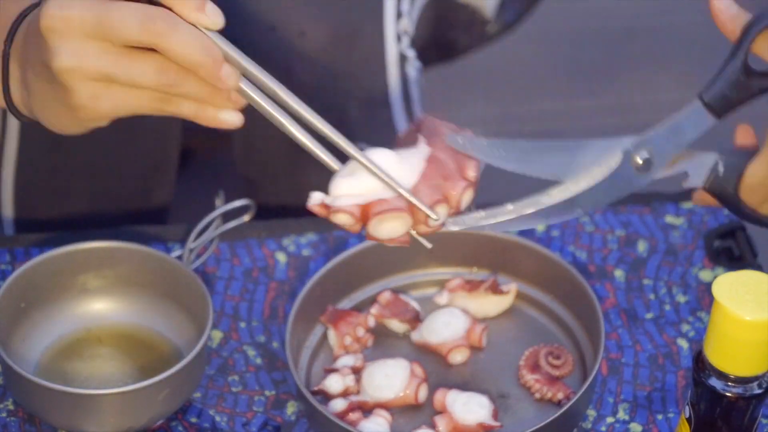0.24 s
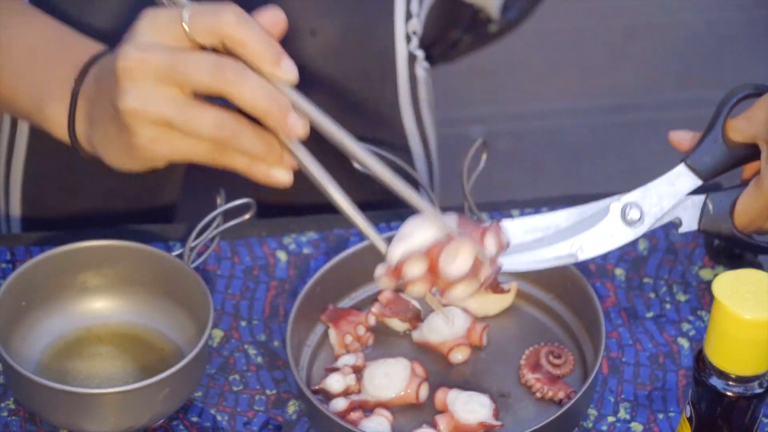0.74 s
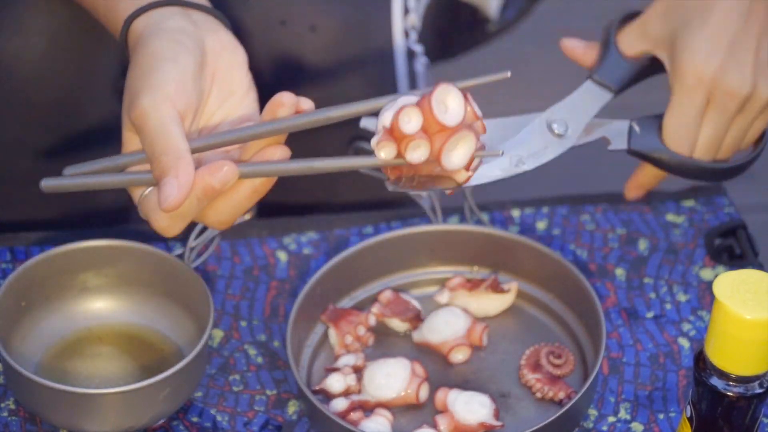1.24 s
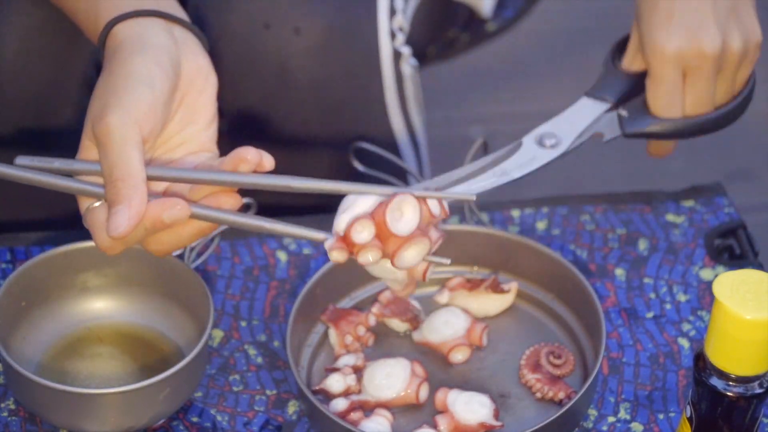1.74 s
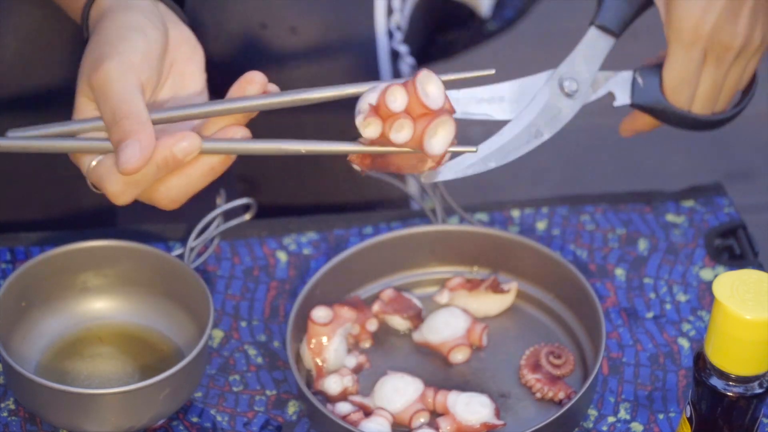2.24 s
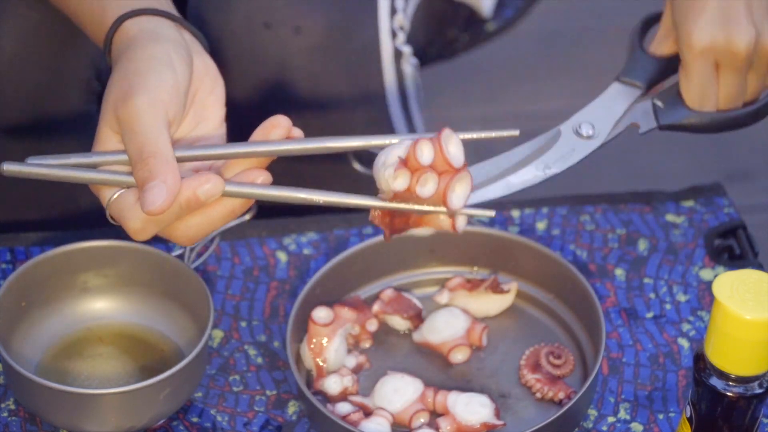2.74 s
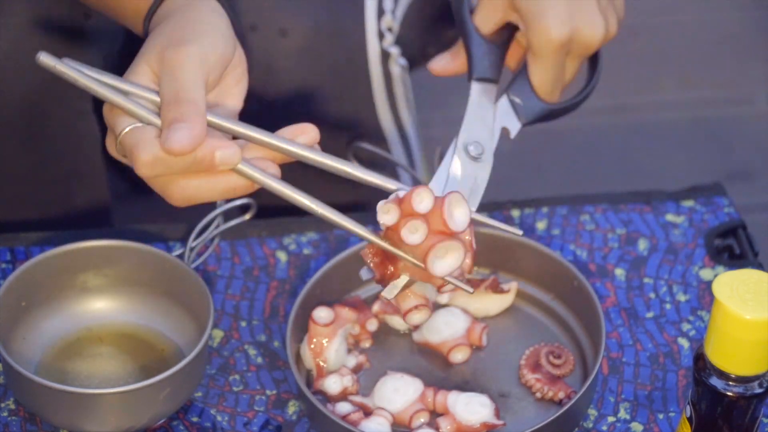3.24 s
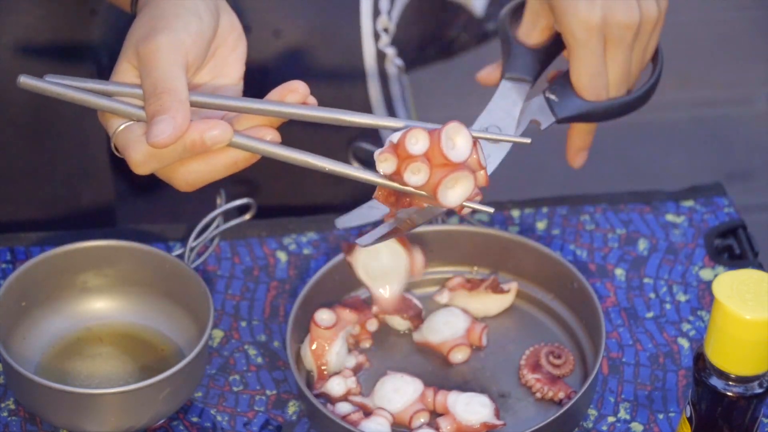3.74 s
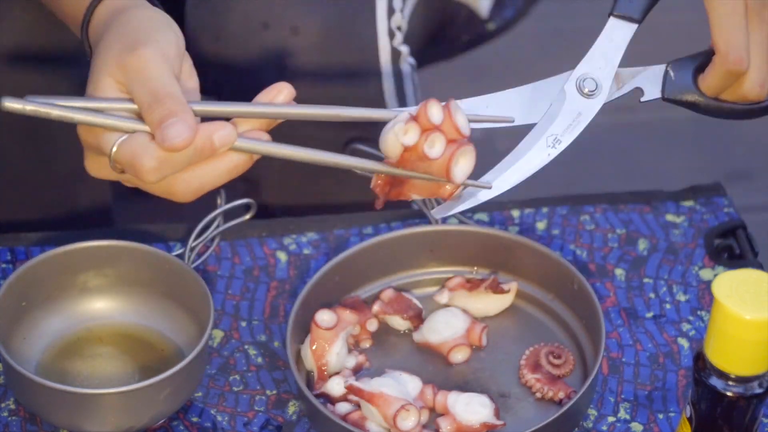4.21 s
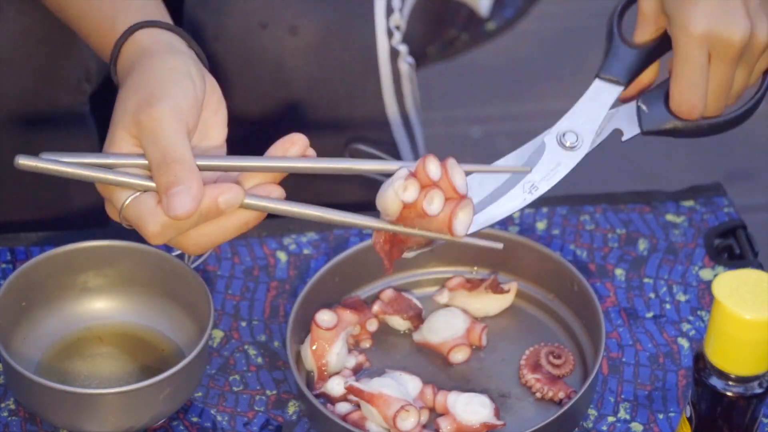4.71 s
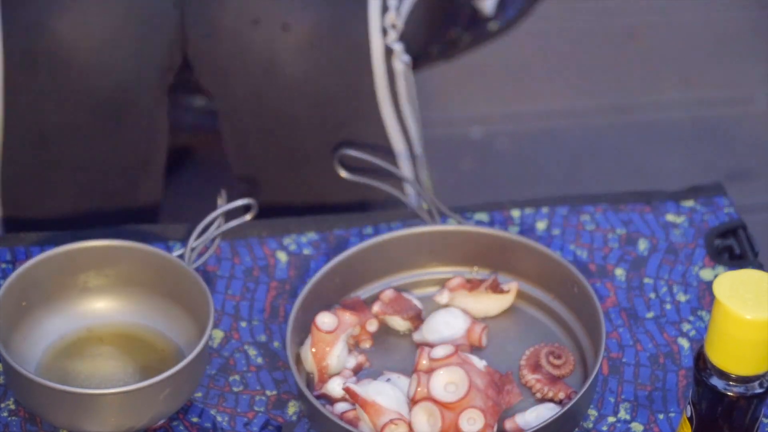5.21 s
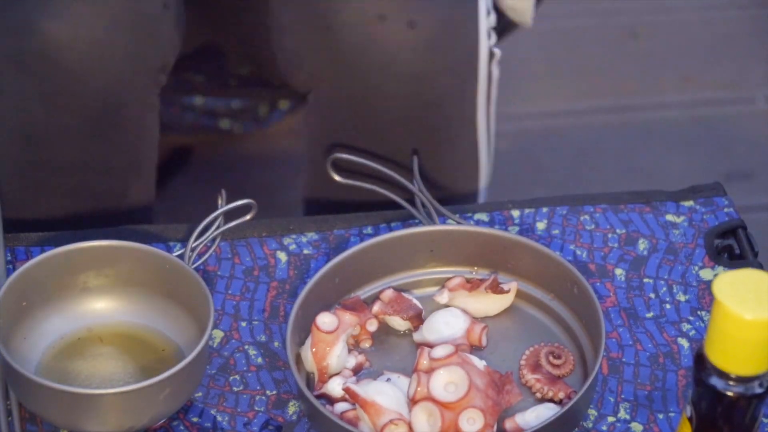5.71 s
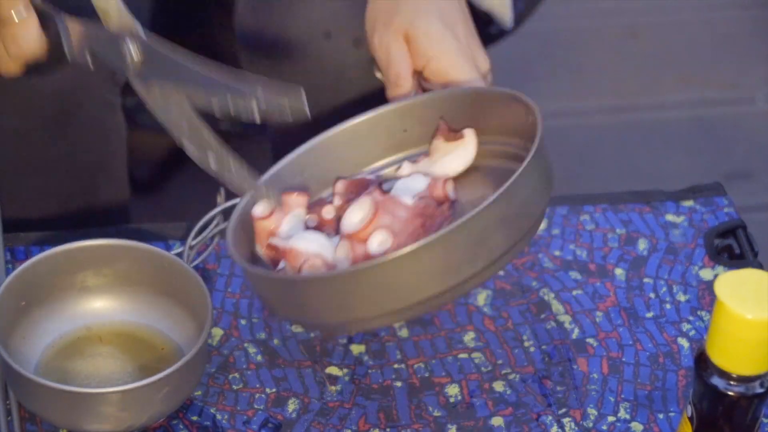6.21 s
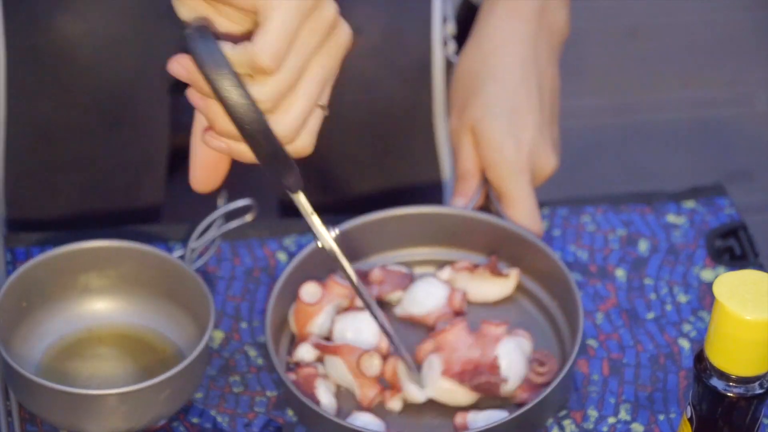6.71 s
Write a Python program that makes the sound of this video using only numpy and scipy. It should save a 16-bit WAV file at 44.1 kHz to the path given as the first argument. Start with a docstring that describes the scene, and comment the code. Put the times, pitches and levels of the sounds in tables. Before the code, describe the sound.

Close steel snips and brief rubbery squeaks over faint outdoor hiss and low handling bumps, ending with sharp clanks and scratches on a thin pan.

```python
"""Kitchen shears cut rubbery seafood held in steel chopsticks: wet flesh squeaks on the blades by stick-slip.
Sliding edges rub noise through the blade resonances, and light contacts click as short filtered bursts.
The tips knock and scratch a thin metal pan, whose decaying modes thud and whose resonances colour the grit.
A small microphone outdoors adds a low rumble and jolts of its mount, distant air and a slightly wavering hiss."""
import sys
import numpy as np
from scipy.fft import rfft, irfft, next_fast_len
from scipy.io import wavfile
from scipy.ndimage import map_coordinates

SR = 44100
rng = np.random.default_rng(int(sys.argv[2]) if len(sys.argv) > 2 else 0)


def log_audio(samples):
    """Write samples as a 16-bit WAV file to the path given in sys.argv[1]."""
    # one column per channel
    frames = np.atleast_2d(samples).T
    # limit to full scale, then quantise
    limited = np.clip(frames, -1, 1)
    pcm = np.round(limited * 32767).astype(np.int16)
    wavfile.write(sys.argv[1], SR, pcm)


N = 306936  # samples


def amp(db):
    """Decibel law: a level in dB as a linear amplitude."""
    return 10 ** (np.asarray(db) / 20)


def unit(x):
    """Normalisation: the signal scaled to an rms of 1."""
    return x / np.sqrt(np.mean(x ** 2) + 1e-20)


def filtered(x, response):
    """Linear filtering: the spectrum of x times a complex response of frequency."""
    m = next_fast_len(len(x) + 8192)
    spectrum = rfft(x, m) * response(np.fft.rfftfreq(m, 1 / SR))
    return irfft(spectrum, m)[:len(x)]


def resonant(modes):
    """Modal superposition: causal second-order resonances summed with alternating sign."""
    def response(f):
        total = 0
        for k, (centre, width, db) in enumerate(modes):
            damping = 1j * f * width
            total = total + (-1) ** k * amp(db) * damping / (centre * centre - f * f + damping + 1e-9)
        return total
    return response


def coloured(points):
    """Spectral envelope: gain interpolated in dB along a logarithmic frequency axis."""
    f, db = np.transpose(points)
    return lambda hz: amp(np.interp(np.log(hz + 1), np.log(f), db, left=-120, right=-120))


def noise(response):
    """Filtered random excitation: coloured noise of rms 1."""
    return unit(filtered(rng.standard_normal(N), response))


def wobble(rate, size=N):
    """Slow random modulation: a smooth curve through random knots, rate of them a second."""
    knots = rng.standard_normal(int(size * rate / SR) + 4)
    return map_coordinates(knots, [np.arange(size) * rate / SR])


def stroke(rows):
    """Piecewise-linear control: sample slice, soft-edged gate and interpolated columns of a short table."""
    s, *columns = np.transpose(rows)
    i = np.arange(round(s[0] * SR), min(N, round(s[-1] * SR)))
    # a stroke that reaches the last sample of the scene has no closing edge
    to_end = i[-1] - i + (i[-1] == N - 1) * SR
    edge = np.minimum(i - i[0], to_end) / (.002 * SR)
    return slice(i[0], i[-1] + 1), np.clip(edge, 0, 1), [np.interp(i / SR, s, c) for c in columns]


def swell(s, rise, fall):
    """Growth and decay: slice, gate and progress, -1 at the start, 0 when fullest, 1 at the end."""
    return stroke([(s - rise, -1), (s, 0), (s + fall, 1)])


def ends(u, first, last, power=1):
    """Power-law slopes: 0 when fullest, bending to a first and a last value."""
    return np.where(u < 0, first, last) * np.abs(u) ** power


def add(out, s, sound):
    """Superposition: mix a short sound in at s seconds."""
    out[round(s * SR):][:len(sound)] += sound


def ring(modes, seconds=.15, rise=0.00042):
    """Free vibration: exponentially decaying sines, each at a new strength for every blow."""
    t = np.arange(int(seconds * SR)) / SR
    spread_db = rng.normal(0, 1.5, len(modes))
    waves = [amp(db - 60 * t / t60) * np.sin(2 * np.pi * hz * t) for hz, db, t60 in modes]
    return amp(spread_db) @ waves * (1 - np.exp(-t / rise))


def taps(events, modes, **shape):
    """Impulsive excitation: touches that leave a body ringing in its modes."""
    out = np.zeros(N + SR)
    for s, db in events:
        add(out, s, amp(db) * ring(modes, **shape))
    return out[:N]


def grit(size, modes, clump_db=0):
    """Frictional excitation: lumpy noise of rms 1 from a set of resonances."""
    lumps = amp(3 * wobble(350, size=size))
    clumps = amp(clump_db * wobble(66, size=size))
    return unit(filtered(rng.standard_normal(size), resonant(modes)) * lumps * clumps)


# Level of the distant outdoor air: (time [s], level [dB])
AIR_LEVEL = [(0.0, -65), (1.18, -61.5), (6.96, -68)]
# Spectra of the air and of the microphone's hiss: (frequency [Hz], relative density [dB])
AIR_SPECTRUM = [(150, -26), (250, -9), (301, -12), (344, -14), (561, -9.5), (1600, -19), (2080, -42),
                (3520, -120)]
HISS_SPECTRUM = [(530, -36), (900, -2), (1470, -4), (2240, -1), (2780, -1), (3330, -1), (4610, -1),
                 (8510, -1.5), (12800, -6), (15900, -9)]
HISS_DB = -57.5


def background():
    """Stationary noise, slowly modulated: distant outdoor air and the microphone's hiss."""
    s, db = np.transpose(AIR_LEVEL)
    air_db = np.interp(np.arange(N) / SR, s, db) + 0.75 * wobble(11)
    air = amp(air_db) * noise(coloured(AIR_SPECTRUM))
    hiss = amp(HISS_DB + 1.56 * wobble(8)) * noise(coloured(HISS_SPECTRUM))
    return air + hiss


# Shaking of the microphone's mount: (time [s], low resonances [dB], high resonances [dB])
MOUNT_SHAKE = [(0, -42, -52), (.4, -44, -47.5), (.6, -49, -66.5), (1.3, -48, -59), (1.5, -58, -81),
               (2, -53, -65.5), (2.3, -43, -52), (2.75, -46.5, -55), (3.05, -56.5, -68.5), (5.6, -56, -64),
               (6.1, -51, -62.5), (6.4, -58.5, -64), (6.96, -52, -60)]
# Low and high resonances of the mount: (frequency [Hz], width [Hz], relative level [dB])
MOUNT_LOW_MODES = [(59.9, 19.1, 2), (84.7, 32.8, -2)]
MOUNT_HIGH_MODES = [(163.2, 31, 5), (232.7, 16.6, 0.5)]


def rumble():
    """Forced vibration: lumpy noise drives the resonances of the microphone's mount."""
    s, low_db, high_db = np.transpose(MOUNT_SHAKE)
    t, lumps = np.arange(N) / SR, wobble(14)
    low = unit(noise(resonant(MOUNT_LOW_MODES)) * amp(1.3 * lumps))
    high = unit(noise(resonant(MOUNT_HIGH_MODES)) * amp(2.86 * lumps))
    return amp(np.interp(t, s, low_db)) * low + amp(np.interp(t, s, high_db)) * high


# Jolts of the mount: (time [s], strength [dB], middle modes against it [dB], knock against it [dB])
MOUNT_JOLTS = [(.063, -35.5, 1.5, -12), (0.238, -21, -15, -22), (.327, -22, -5.5, -4),
               (0.89, -37.5, -22, -27), (1.094, -48.5, 2.5, 7.5), (1.271, -39, -22, -20),
               (2.038, -32, -12, -27), (2.251, -35, -5.5, -14), (2.37, -29, -10.5, -21),
               (5.078, -48.5, 4, -8), (5.937, -34.5, -4.5, -8)]
# Low, middle and knocking modes: (frequency [Hz], relative level [dB], decay by 60 dB [s])
JOLT_LOW_MODES = [(61.8, 3, 0.3), (82.9, -1, 0.15)]
JOLT_MIDDLE_MODES = [(120, 0, 0.28), (160.2, 4, 0.23), (217.6, -3, 0.19)]
JOLT_KNOCK_MODES = [(265.5, 1, 0.087), (340, 0, 0.055), (435, -7, 0.07), (744, -3, 0.022)]


def jolts():
    """Transient response: soft pushes swing the mount, and quicker onsets ring its higher modes."""
    s, db, middle_db, knock_db = np.transpose(MOUNT_JOLTS)
    low = taps(zip(s, db), JOLT_LOW_MODES, seconds=.5, rise=0.008)
    middle = taps(zip(s, db + middle_db), JOLT_MIDDLE_MODES, seconds=0.65, rise=0.0031)
    knock = taps(zip(s, db + knock_db), JOLT_KNOCK_MODES, rise=0.0025)
    return low + middle + knock


# Tips scratching the pan: (time when fullest [s], rise [s], fall [s], wall level [dB],
# bottom level [dB], lift of the highest bottom mode [dB])
PAN_SCRATCHES = [(5.402, .008, 0.007, -62, -40, -9), (5.426, 0.0091, 0.017, -59, -40.5, -8),
                 (6.162, 0.0031, 0.024, -57, -33, 6), (6.181, 0.0021, .009, -33, -41, 3),
                 (6.193, 0.0052, 0.0088, -42, -44, 1), (6.204, 0.0044, 0.013, -47, -40.5, 6),
                 (6.223, 0.0075, 0.021, -58, -45, -4), (6.517, 0.0051, 0.0056, -27.5, -37, 1.5),
                 (6.649, 0.0027, 0.02, -27, -32.5, 0.5), (6.67, 0.0088, 0.0072, -33.5, -43.5, 12),
                 (6.689, .003, 0.015, -40, -40, 7), (6.707, 0.0075, 0.012, -48, -41.5, 4),
                 (6.715, 0.0047, 0.013, -40.5, -40, 4), (6.733, .005, 0.018, -61, -42, -6),
                 (6.753, .005, 0.028, -46, -31, -7), (6.924, 0.0028, 0.0069, -55, -37, -2),
                 (6.933, 0.0052, .006, -68, -37.5, 12), (6.944, .008, .008, -57, -36, 12),
                 (6.953, 0.0076, 0.022, -30, -34, 18)]
# Resonances of the wall and the bottom: (frequency [Hz], width [Hz], relative level [dB])
PAN_WALL_MODES = [(5800, 3700, -2), (7600, 380, 12), (9140, 890, 10.5), (12200, 3300, 5.5), (14600, 580, 9)]
PAN_BOTTOM_MODES = [(900, 600, 1), (1750, 520, -1), (3250, 600, -0.5)]
DRAG_FIRST_DB, DRAG_LAST_DB, DRAG_POWER = -3.5, -29, 0.88  # level at the two ends; bend of the slopes


def dragging():
    """Friction-driven plate: scratching tips excite the wall and the bottom of the pan."""
    out = np.zeros(N)
    *low_modes, (hz, width, db) = PAN_BOTTOM_MODES
    for s, rise, fall, wall_db, bottom_db, lift_db in PAN_SCRATCHES:
        at, gate, (u,) = swell(s, rise, fall)
        shape = gate * amp(ends(u, DRAG_FIRST_DB, DRAG_LAST_DB, DRAG_POWER))
        wall = grit(len(u), PAN_WALL_MODES)
        bottom = grit(len(u), [*low_modes, (hz, width, db + lift_db)], clump_db=1.5)
        out[at] += shape * (amp(wall_db) * wall + amp(bottom_db) * bottom)
    return out


# Chopsticks touching: (time [s], level [dB])
CHOPSTICK_TOUCHES = [(5.4455, -46.5), (5.502, -54)]
# Modes of a chopstick: (frequency [Hz], relative level [dB], decay by 60 dB [s])
CHOPSTICK_MODES = [(2780, 3, 0.038), (3600, -2, 0.065), (4960, -1, 0.041), (6708, -2, 0.055),
                   (9109, 1, .06), (12130, 5, .06)]


def chopstick_touches():
    """Bar vibration: touching chopsticks ring in their modes."""
    return taps(CHOPSTICK_TOUCHES, CHOPSTICK_MODES)


# A blade tip touching steel: (time [s], level [dB])
TIP_TOUCHES = [(6.2911, -43.5)]
# Modes of the tip: (frequency [Hz], relative level [dB], decay by 60 dB [s])
TIP_MODES = [(5970, -0.5, 0.086), (13700, -6, .1)]


def tip_touches():
    """Free vibration after contact: a blade tip rings against steel."""
    return taps(TIP_TOUCHES, TIP_MODES)


CRACK_T60_S, HARD_SHORTENS = 0.012, 0.13  # decay at a peak of -32 dB; dB shorter per dB harder


def crack(db, hz, treble_db):
    """Impact spectrum: a brief noise burst resonates near its own pitch; harder impacts are shorter."""
    t = np.arange(int(.08 * SR)) / SR
    t60 = np.clip(CRACK_T60_S * amp(-HARD_SHORTENS * (db + 32)), .002, .08)
    burst = amp(-60 * t / t60) * rng.standard_normal(len(t))
    burst[0] = 1.8  # a firm first sample
    near, broad = resonant([(hz, .5 * hz, 0)]), resonant([(9140, 24500, 0)])
    burst = filtered(burst, lambda f: near(f) ** 2 + amp(treble_db) * broad(f) ** 2)
    return amp(db) * burst / np.abs(burst).max()


# Light clicks of steel: (time [s], peak level [dB], ringing frequency [Hz], treble against it [dB])
STEEL_CLICKS = [(0.1896, -34, 5500, -10), (0.2575, -29, 7800, -8), (0.4733, -31.5, 7600, -16),
                (.684, -35, 2100, -19), (.7398, -34, 5600, -13), (0.787, -26.5, 4650, -7),
                (.8465, -39.5, 8750, -3), (.898, -39.5, 9300, -3), (.962, -38, 3500, -6),
                (1.0484, -28.5, 3800, -2), (1.089, -20.5, 4860, -2.5), (1.158, -43, 4900, -12),
                (1.2145, -39, 2200, -16), (1.2372, -35.5, 2200, -13), (1.251, -36.5, 5430, -11),
                (1.54, -36, 4730, -1), (1.5805, -32, 4900, -13), (1.727, -41, 2900, -16),
                (1.756, -40, 2100, -16), (1.777, -24.5, 2930, -12.5), (1.7821, -14, 12200, 13),
                (1.789, -30, 2900, -9), (1.7938, -30, 2880, -9), (1.8005, -30, 4770, -12),
                (1.8187, -18, 5800, -12), (1.826, -35.5, 3180, -18), (1.9418, -36, 2980, -18),
                (2.0674, -30.5, 7840, 0), (2.105, -35.5, 3630, 0), (2.1456, -31, 8100, 1),
                (2.8214, -40, 9560, -7), (2.8447, -11, 12800, -1), (3.3688, -20.5, 14600, 18),
                (3.499, -31, 4000, -13), (3.5305, -29.5, 2640, -3), (3.5656, -29, 3540, -15),
                (3.856, -32.5, 7760, 9), (4.9113, -19, 4640, -1), (5.369, -42, 1600, -14),
                (5.4465, -36, 5500, -3), (5.491, -38, 2500, -6), (5.502, -39, 5500, -3),
                (5.9177, -38, 9170, -12), (6.2384, -40, 8600, -7)]


def clicks():
    """Impulsive contact: light cracks of steel on steel."""
    out = np.zeros(N + SR)
    for s, *blow in STEEL_CLICKS:
        add(out, s, crack(*blow))
    return out[:N]


# Knocks on the pan: (time [s], crack peak level [dB], crack ringing frequency [Hz],
# treble against the ringing [dB], thud level [dB], thud frequency [Hz])
PAN_KNOCKS = [(0.2138, -42, 7360, -12, -45.5, 750), (.3178, -28.5, 2880, -13, -30.5, 890),
              (.679, -38, 4540, -12, -27, 1500), (1.0921, -24, 5130, -10, -33, 990),
              (1.7175, -31.5, 4900, -22, -32, 1650), (3.8743, -33.5, 3340, -4, -24.5, 1007),
              (4.6727, -55, 4570, -9, -37, 1290), (5.0768, -31, 6730, 7, -17.5, 1360),
              (5.3828, -17, 5870, -24, -14.5, 1780), (5.3859, -27, 1870, -36, -19, 1110),
              (5.409, -18, 4050, -31, -13.5, 1415), (5.4172, -23.5, 3600, -7, -19, 1200),
              (5.8414, -38.5, 4100, -7, -33.5, 1330), (5.934, -29, 10100, 13, -45, 595),
              (6.1574, -20.5, 3270, -40, -15, 1210), (6.4189, -24, 2770, -42, -23, 880),
              (6.5107, -17, 9100, -25, -26, 916), (6.6465, -12.5, 8350, 3, -20.5, 820),
              (6.7546, -8.5, 11500, -1.5, -13, 1685), (6.9195, -16.5, 3100, -15, -22, 965)]
THUD_T60_S, THUD_STEEP = .014, 1.2  # decay at 1 kHz; higher thuds die faster by this power


def pan_knocks():
    """Plate bending: a cracking blow bends the thin pan for a few cycles and leaves it rattling."""
    out, t = np.zeros(N + SR), np.arange(int(.08 * SR)) / SR
    for s, *blow, thud_db, thud_hz in PAN_KNOCKS:
        t60 = THUD_T60_S * (1000 / thud_hz) ** THUD_STEEP
        bend = [(thud_hz, thud_db, t60),
                (0.874 * thud_hz, thud_db - 11.5, t60),
                (1.51 * thud_hz, thud_db - 11.5, 1.67 * t60),
                (2.564 * thud_hz, thud_db - 13.5, 0.39 * t60)]
        rattle = amp(thud_db - 23 - 60 * t / 0.032) * grit(len(t), [(2460, 1100, 0)])
        add(out, s, crack(*blow) + rattle)
        add(out, s, ring(bend))
    return out[:N]


# Edge sliding on edge: (time when fullest [s], rise [s], fall [s], level [dB],
# wet squelch against it [dB], frequency factor of the blade modes [ratio])
EDGE_SLIDES = [(0.095, 0.011, 0.065, -53, -5, 1.06), (.7, 0.01, 0.0069, -60, 12.5, .99),
               (0.725, 0.0075, 0.018, -63, 8, .99), (.765, 0.023, 0.031, -64, 11, 0.9),
               (1.052, 0.0032, 0.019, -44.5, -1.5, 0.79), (1.093, 0.0077, 0.015, -45, -1, 0.79),
               (1.214, 0.033, 0.032, -50.5, -1, 0.94), (1.621, .026, 0.038, -31.5, -10, 1.035),
               (2.962, .025, 0.047, -39, -4, 0.99), (3.621, .004, 0.0054, -48, 9, 1.07),
               (3.676, 0.007, 0.015, -55.5, 8, 0.71), (4.917, 0.012, 0.032, -31.5, -14, 1.174),
               (5.024, 0.017, 0.03, -53, -11, 1.11), (5.105, 0.032, 0.031, -35.5, -4, 0.96),
               (5.195, 0.031, .04, -59, -14, 1.0)]
# Resonances of the blades and of the wet flesh: (frequency [Hz], width [Hz], relative level [dB])
BLADE_MODES = [(4250, 550, 6), (6570, 640, 19.5), (7250, 480, 20.5), (9000, 12000, -3.5), (15300, 800, -3)]
SQUELCH_MODES = [(1500, 680, 2.5), (1970, 1500, -6.5), (4030, 1300, -3)]
SHEAR_FIRST_DB, SHEAR_LAST_DB, SHEAR_POWER = -17, -31, 1.68  # level at the two ends; bend of the slopes


def shearing():
    """Sliding friction: edge on edge excites the blade modes, and the flesh squelches below."""
    out = np.zeros(N)
    for s, rise, fall, db, wet_db, shift in EDGE_SLIDES:
        at, gate, (u,) = swell(s, rise, fall)
        modes = [(hz * shift, width, mode_db) for hz, width, mode_db in BLADE_MODES]
        level_db = db + ends(u, SHEAR_FIRST_DB, SHEAR_LAST_DB, SHEAR_POWER)
        squelch = amp(wet_db) * grit(len(u), SQUELCH_MODES, clump_db=2)
        out[at] += gate * amp(level_db) * (grit(len(u), modes) + squelch)
    return out


# Resonances of the rasp of slipping: (frequency [Hz], width [Hz], relative level [dB])
RASP_MODES = [(2490, 2300, 1.5), (5770, 4600, 0), (9800, 2000, 1.5)]


def slips(hz, db, under_db, loss_db, colour, jitter, rough_db, rasp_db):
    """Stick-slip oscillation: a harmonic series whose overtones fall away and take the colour of the steel."""
    size = len(hz)
    phase = 2 * np.pi * np.cumsum(hz * (1 + jitter * wobble(526, size=size))) / SR
    # the slipping also rasps, following the second harmonic at 0.55 dB per dB
    out = amp(0.55 * (db - under_db - loss_db) + rasp_db) * grit(size, RASP_MODES, clump_db=2)
    gain_at = coloured(colour)
    for k in range(10):
        # uneven slips break up the higher overtones
        slope_db = rough_db * wobble(644, size=size) - loss_db
        gain = amp(db - under_db * (k > 0) + k * slope_db) * gain_at((k + 1) * hz)
        # each overtone lags a little more, so the slips are not sharp spikes
        out += np.sqrt(2) * gain * np.cos((k + 1) * phase + (k + 1) ** 2 / 2)
    return out


# One thin wavering chirp while the blades work into the flesh: (time [s], frequency [Hz], level [dB])
CHIRP_GLIDE = [(1.375, 953, -48), (1.388, 1656, -52), (1.398, 2483, -38), (1.408, 1040, -50),
               (1.42, 1138, -42.5), (1.434, 2105, -48), (1.439, 2775, -44), (1.445, 3300, -33.5),
               (1.452, 2630, -32), (1.458, 1500, -60), (1.474, 900, -45), (1.483, 1463, -43),
               (1.489, 2280, -40), (1.495, 2115, -31.5), (1.499, 1750, -50), (1.508, 2100, -58)]
# Colour of the chirp: (frequency [Hz], gain [dB])
CHIRP_GAIN = [(800, -18), (1500, -2.5), (2200, 5), (3100, -10), (4200, -8), (6100, 4), (7500, -14),
              (16000, -30)]
CHIRP_LOSS_DB = 6  # per overtone


def chirp():
    """Irregular stick-slip: a rough, thin slip whose rate wavers widely."""
    out = np.zeros(N)
    at, gate, (hz, db) = stroke(CHIRP_GLIDE)
    out[at] = gate * slips(hz, db, 0, CHIRP_LOSS_DB, CHIRP_GAIN, jitter=.016, rough_db=.9, rasp_db=-21)
    return out


# Flesh slipping on steel: (time when full [s], rise [s], hold [s], fall [s],
# frequency at the start, when full, after the hold and at the end [Hz], level before colouring [dB],
# overtones under the tone [dB], loss per overtone when full and after the hold [dB])
FLESH_SQUEAKS = [(1.598, .014, .008, 0.017, 1390, 1500, 1515, 1205, -24.5, 0.5, 2, 5),
                 (2.943, 0.0033, 0.0033, 0.018, 1460, 1340, 1370, 1200, -28.5, 5, 3, 9),
                 (3.334, 0.0069, 0.0093, 0.0069, 1440, 1400, 1425, 1170, -30.5, -1, 2, 2),
                 (3.397, 0.014, 0.0055, 0.0049, 1245, 1450, 1390, 1260, -27.5, 1, 15, 19),
                 (3.455, 0.0035, 0.016, 0.025, 1710, 1830, 1456, 1163, -27.5, 2.5, -3.5, 0.5),
                 (3.504, 0.007, 0.012, .008, 1356, 1400, 1323, 1200, -26, -5.5, 11.5, 18),
                 (3.546, 0.011, 0.0042, 0.0066, 1434, 1330, 1240, 1060, -29.5, -5, 13.5, 15),
                 (3.576, .003, .025, .011, 1310, 1195, 1065, 1050, -34, 5, 1, -0.5),
                 (3.622, 0.0063, 0.047, 0.0187, 995, 1034, 1002, 1190, -37, 8.5, -3, -1),
                 (4.91, 0.0044, 0.0037, 0.013, 1576, 1500, 1490, 1290, -27.5, 6.5, -3, 8),
                 (5.088, .005, 0.0096, 0.0083, 1300, 1490, 1435, 1190, -25, 10.5, 5.5, 4)]
# Colour of a squeak: (frequency [Hz], gain [dB])
SQUEAK_GAIN = [(900, -3.5), (1500, 0.5), (2100, -15), (2900, -1.5), (3400, -6.5), (4200, 5.5), (5100, -10),
               (6200, -7.5), (7200, -16.5), (9000, -47), (16000, -36)]
SQUEAK_FIRST_DB, SQUEAK_LAST_DB, SQUEAK_POWER = -7.5, -11.5, 0.89  # level at the two ends; bend of the slopes
DULL_FIRST_DB, DULL_LAST_DB, DULL_POWER = 5.5, 6, 0.31  # extra loss per overtone at the two ends; its bend


def squeal():
    """Gliding stick-slip: each squeak swells, holds and fades, losing overtones towards both ends."""
    out = np.zeros(N)
    for s, rise, hold, fall, *pitch, db, under_db, full_db, held_db in FLESH_SQUEAKS:
        times = s + np.cumsum([-rise, rise, hold, fall])
        losses = [full_db, full_db, held_db, held_db]
        at, gate, (u, hz, loss_db) = stroke(list(zip(times, [-1, 0, 0, 1], pitch, losses)))
        level_db = db + ends(u, SQUEAK_FIRST_DB, SQUEAK_LAST_DB, SQUEAK_POWER)
        dull_db = loss_db + ends(u, DULL_FIRST_DB, DULL_LAST_DB, DULL_POWER)
        tone = slips(hz, level_db, under_db, dull_db, SQUEAK_GAIN, jitter=.003, rough_db=.3, rasp_db=-33)
        out[at] += gate * tone
    return out


def scene():
    """Superposition: all sources add at one microphone."""
    surroundings = background() + rumble() + jolts()
    steel = clicks() + pan_knocks() + chopstick_touches() + tip_touches()
    friction = dragging() + shearing() + chirp() + squeal()
    return (surroundings + steel + friction)[None]


TOP_HZ = 17030  # upper limit of the sound: nothing is heard above this frequency


def record(dry):
    """Band limiting: the microphone weakens the deepest bass, and nothing is heard above the upper limit."""
    def response(hz):
        bass_cut = 1 / (1 + (55 / (hz + 1)) ** 10)
        return (hz < TOP_HZ) * (amp(-17) + bass_cut)
    return filtered(dry[0], response)[None]


dry = scene()
out = record(dry)
log_audio(out)
```